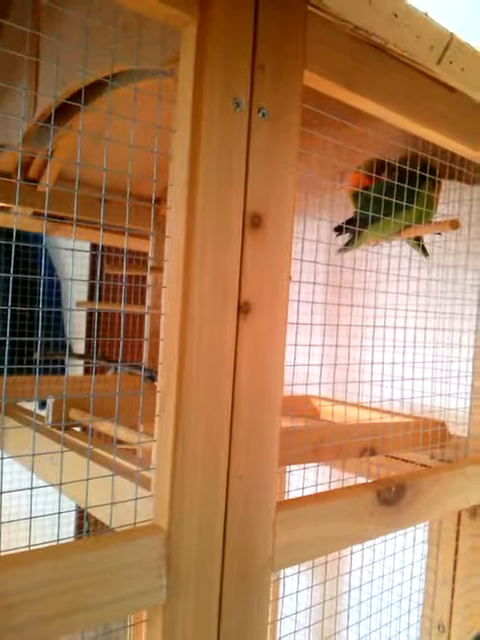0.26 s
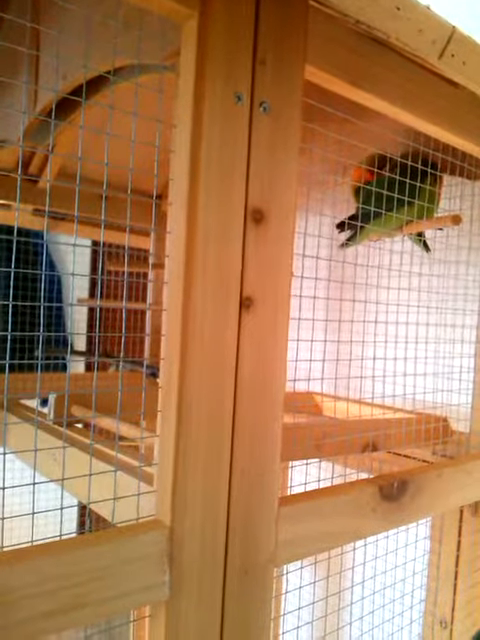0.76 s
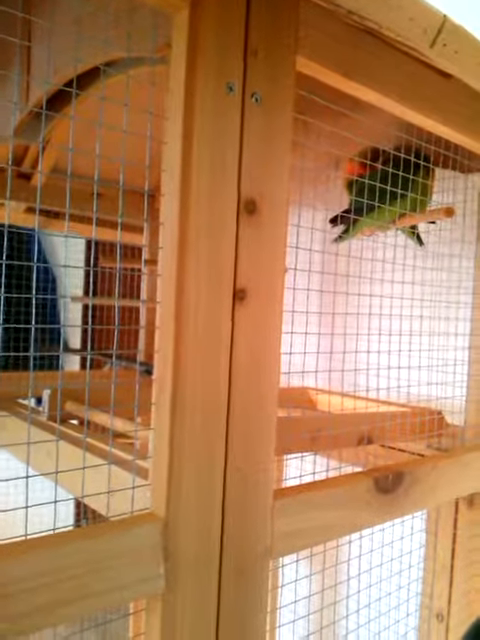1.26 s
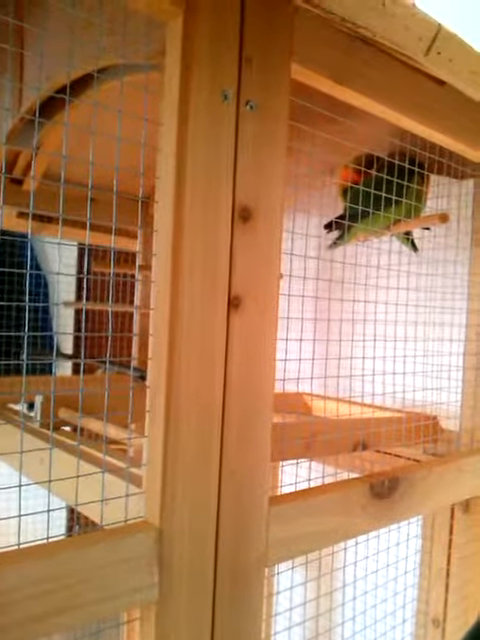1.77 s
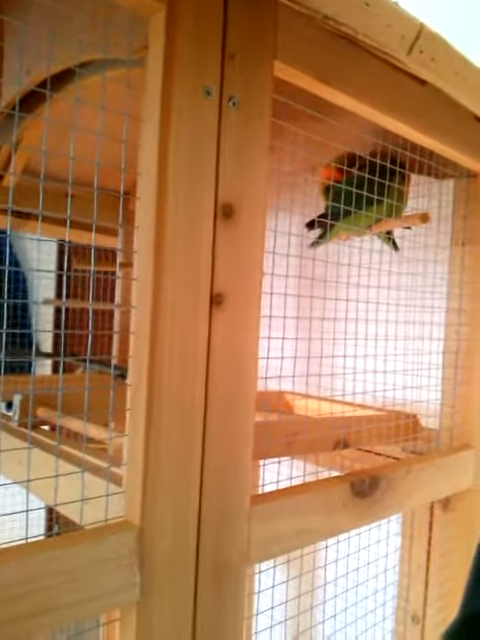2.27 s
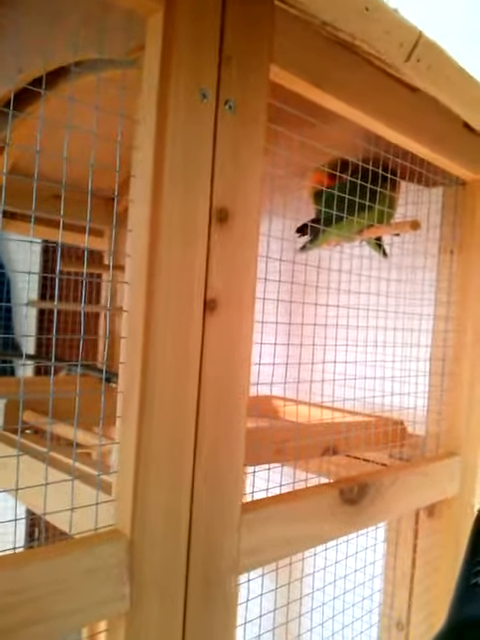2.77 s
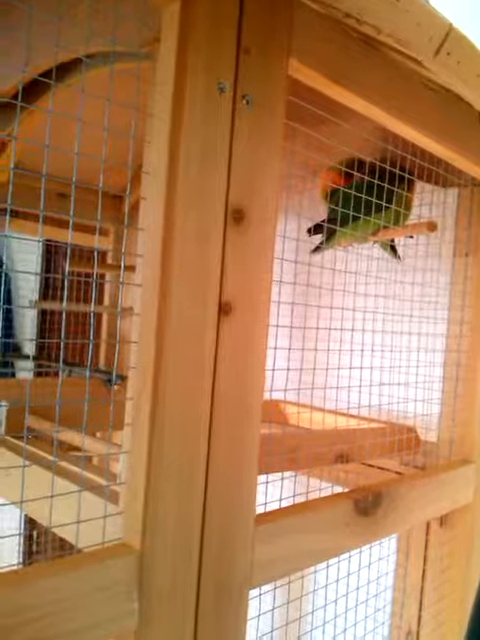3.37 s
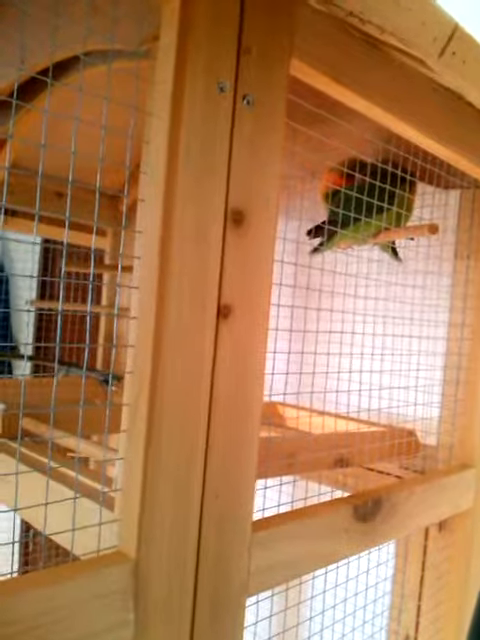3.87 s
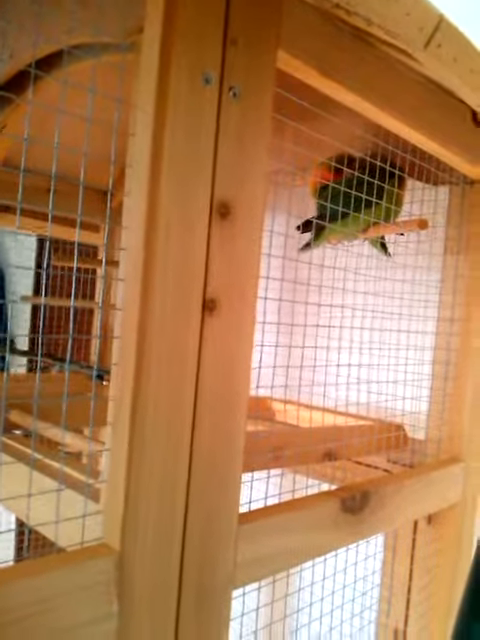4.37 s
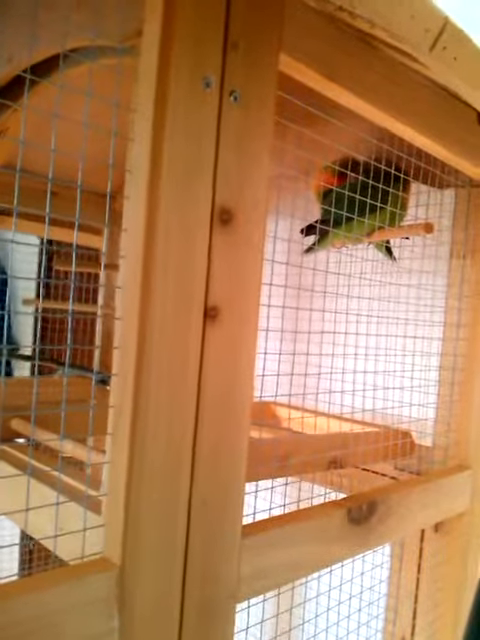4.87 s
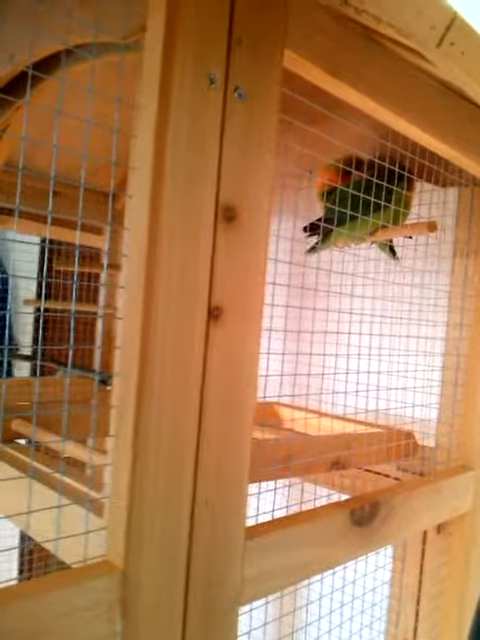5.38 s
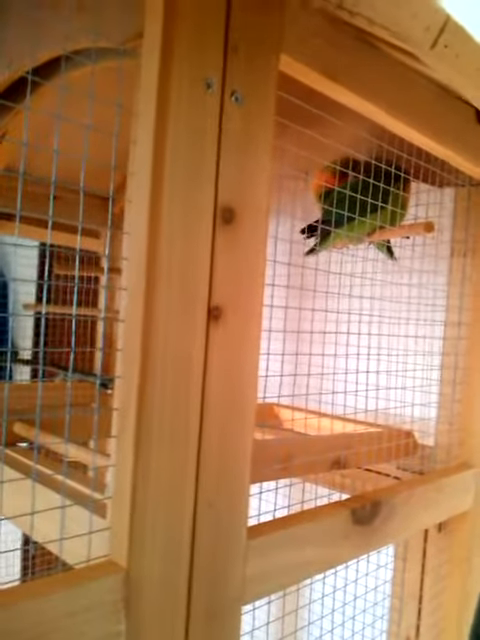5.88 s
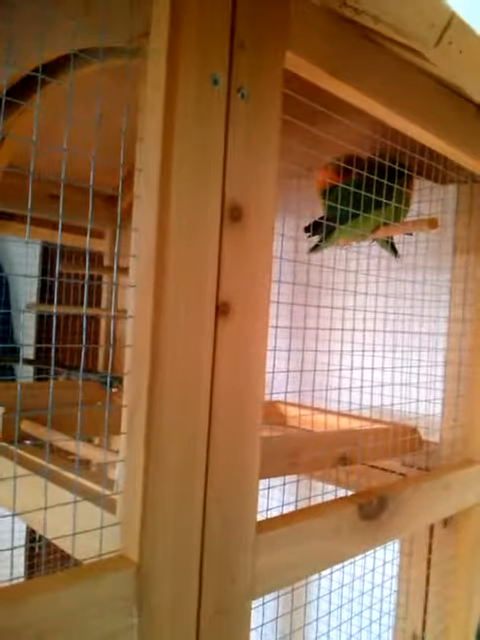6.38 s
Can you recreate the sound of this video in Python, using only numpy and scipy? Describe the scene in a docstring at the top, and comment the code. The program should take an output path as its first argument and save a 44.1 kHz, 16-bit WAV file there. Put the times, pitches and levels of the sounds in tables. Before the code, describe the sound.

A high chirp is already sounding, then a gap, then a sparse twitter thickening into sharp whistles. More bursts follow, the busiest a little past the middle, with further groups near the end and one last small chirp. The parrot's voice glides fast, piercing at its peaks, hoarse at the breaks. A small reverberant wooden enclosure surrounds it; soft room hiss and a low wavering hum lie beneath, dipping when the bird rests.

```python
"""A whistle already under way opens the scene: a small parrot chirps and twitters on its perch.
Its syrinx makes gliding whistles with overtones and a hoarse rasp; low croaks fall in between.
The wooden indoor aviary rings after each note: sparse close echoes, then a dense noise tail.
Shaped noise gives the room hiss and a wavering sine the mains hum below the bird.
The recorder's expander lets both sink in the pauses."""
import sys
import numpy as np
from scipy import signal
from scipy.fft import rfft, irfft, next_fast_len
from scipy.io import wavfile
from scipy.ndimage import uniform_filter1d

SR = 44100
rng = np.random.default_rng(int(sys.argv[2]) if len(sys.argv) > 2 else 0)


def linear_from_db(decibels):
    """Turn decibels (scalar or array-like) into linear amplitude factors; 0 gives 1."""
    return 10 ** (np.asarray(decibels, float) / 20)


def dump(signal):
    """Clip the signal to [-1, 1] and save it as 16-bit WAV at the path in sys.argv[1]."""
    limited = np.clip(np.atleast_2d(signal).T, -1, 1)
    pcm = np.round(limited * 32767).astype(np.int16)
    wavfile.write(sys.argv[1], SR, pcm)


N = 291942   # scene length in samples
LEAD = round(0.05 * SR)   # samples ahead of time zero, where the first notes begin

# Parrot notes: overtones_db, rasp_db (both before the voice's own shifts), contour.
# Contour rows: time_s, pitch_hz, effort_db (level of the fundamental)
PARROT_NOTES = [ (-42, -42.5, [(-0.04, 3592, -24), (-0.025, 4300, -24.5), (-0.012, 5900, -23.5),
                (0.0, 3770, -24), (0.004, 3780, -25.5), (0.007, 5210, -24.5), (0.017, 5364, -22.5),
                (0.02, 4750, -26), (0.024, 4210, -27), (0.036, 4183, -27)]),
                (-67.5, -67, [(-0.01, 2410, -45), (0.03, 2493, -52.5)]),
                (-73.5, -63.5, [(0.654, 2430, -59.5), (0.66, 2550, -55.5)]),
                (-48, -67.5, [(0.662, 2680, -38), (0.672, 3010, -44), (0.68, 3220, -41)]),
                (-49, -52, [(0.681, 3550, -41.5), (0.69, 3810, -52.5)]), (-53.5, -63, [(0.775, 1600, -46),
                (0.785, 1794, -50)]), (-61.5, -74.5, [(0.836, 1820, -54), (0.848, 2070, -57)]),
                (-54.5, -52, [(0.918, 1533, -45.5), (0.927, 2896, -46)]),
                (-51.5, -60, [(0.928, 3250, -52.5), (0.932, 3360, -56), (0.935, 3320, -62.5),
                (0.939, 3474, -50)]), (-62, -57, [(0.942, 2940, -62.5), (0.955, 1625, -51.5)]),
                (-48, -46, [(1.02, 3210, -52), (1.027, 3210, -38.5), (1.04, 1947, -43.5),
                (1.055, 1903, -46)]), (-43.5, -56.5, [(1.14, 3130, -44.5), (1.146, 3230, -43),
                (1.153, 3640, -44)]), (-55.5, -46, [(1.154, 3503, -44), (1.162, 3118, -33),
                (1.166, 3955, -44.5), (1.176, 3865, -38.5)]), (-47.5, -61.5, [(1.499, 2760, -50.5),
                (1.505, 2406, -47.5), (1.513, 2030, -49), (1.524, 2064, -41.5)]),
                (-44.5, -42.5, [(1.581, 3000, -35), (1.586, 3016, -41.5), (1.588, 3600, -25),
                (1.59, 3850, -27.5)]), (-44.5, -48, [(1.591, 4270, -4), (1.593, 4920, -28.5),
                (1.597, 5694, -29), (1.604, 5670, -28), (1.608, 5890, -27.5), (1.611, 5316, -26.5),
                (1.622, 5150, -31.5)]), (-60, -45.5, [(1.717, 1862, -52), (1.719, 1890, -57)]),
                (-47.5, -49, [(1.726, 1740, -35), (1.732, 1676, -39), (1.742, 1474, -62)]),
                (-39.5, -50.5, [(1.8, 3200, -32), (1.81, 3407, -44), (1.818, 3138, -25.5)]),
                (-48.5, -43, [(1.819, 3015, -29), (1.824, 2450, -36.5), (1.838, 2047, -38)]),
                (-39.5, -50, [(1.897, 6030, -28), (1.903, 5674, -37.5), (1.91, 6700, -21),
                (1.922, 6836, -36)]), (-44.5, -43, [(2.476, 3510, -39.5), (2.485, 3037, -27),
                (2.49, 2834, -35.5), (2.5, 2165, -41.5)]), (-62, -51, [(2.589, 3140, -47),
                (2.597, 3540, -39), (2.604, 3680, -63)]), (-34, -56.5, [(2.687, 6310, -29.5),
                (2.691, 6430, -28), (2.693, 6770, -27.5), (2.707, 6860, -30.5), (2.718, 6820, -26.5),
                (2.724, 5480, -37)]), (-51.5, -49.5, [(2.724, 5250, -32), (2.727, 3670, -45),
                (2.733, 4650, -32), (2.738, 3800, -36), (2.746, 4260, -49)]),
                (-38.5, -58, [(2.749, 3070, -41.5), (2.753, 3220, -35.5), (2.756, 4326, -29.5),
                (2.764, 4390, -31.5), (2.767, 5270, -28.5), (2.772, 5800, -32.5), (2.785, 5910, -32.5)]),
                (-56.5, -45.5, [(2.929, 2910, -35.5), (2.935, 2414, -41.5), (2.946, 1860, -41.5)]),
                (-48.5, -45.5, [(3.804, 2905, -30.5), (3.81, 3140, -45)]), (-40, -52, [(3.82, 5510, -43),
                (3.828, 4500, -38), (3.835, 2663, -37.5)]), (-42.5, -54.5, [(3.838, 3317, -45),
                (3.852, 3556, -37), (3.862, 3433, -40.5), (3.87, 3310, -47), (3.876, 3520, -35.5)]),
                (-42.5, -51, [(3.877, 5244, -26.5), (3.893, 5490, -57.5)]),
                (-59, -88, [(4.079, 1560, -40.5), (4.086, 1610, -73)]), (-63, -54.5, [(4.222, 1995, -45),
                (4.227, 2344, -50), (4.233, 2775, -53.5)]), (-43, -40.5, [(4.346, 1918, -47),
                (4.36, 2150, -38.5)]), (-39, -48.5, [(4.36, 4160, -36.5), (4.363, 5420, -29.5),
                (4.37, 6220, -34), (4.385, 6300, -34.5)]), (-50, -57, [(4.386, 3113, -34),
                (4.395, 2600, -32), (4.401, 3065, -34), (4.412, 3040, -51.5), (4.425, 3030, -55)]),
                (-49, -52, [                (4.437, 3474, -39.5), (4.443, 3100, -35.5), (4.452, 2750, -36),
                (4.463, 2670, -39.5)]), (-44.5, -62.5, [(4.466, 4530, -42.5), (4.473, 4550, -39),
                (4.477, 4090, -36.5), (4.483, 4390, -34.5), (4.489, 4590, -38.5), (4.498, 3555, -36.5),
                (4.504, 3960, -31.5), (4.515, 4006, -27.5), (4.518, 4880, -36), (4.528, 4810, -53)]),
                (-48, -52, [(4.596, 4280, -33.5), (4.601, 3890, -37), (4.606, 2736, -36.5),
                (4.613, 2130, -40.5), (4.625, 1635, -41.5)]), (-45, -63, [(4.668, 2894, -34.5),
                (4.678, 3270, -34.5), (4.687, 3216, -39.5)]), (-47.5, -47.5, [(4.688, 3064, -25),
                (4.692, 2450, -42.5), (4.71, 1823, -40)]), (-55.5, -51.5, [(4.762, 3240, -51),
                (4.78, 2914, -44), (4.797, 2570, -45.5)]), (-47, -47, [(5.264, 3160, -43),
                (5.275, 2650, -35.5), (5.281, 3400, -37)]), (-41, -50, [(5.283, 3587, -34.5),
                (5.29, 3750, -44), (5.3, 3523, -46.5), (5.31, 3203, -30.5), (5.323, 2958, -31.5),
                (5.334, 2802, -32)]), (-42, -50.5, [(5.336, 2830, -35), (5.34, 3856, -26),
                (5.35, 6400, -29.5), (5.357, 6430, -32)]), (-52, -47.5, [(5.398, 2174, -30),
                (5.402, 2727, -39.5), (5.407, 2963, -33.5), (5.42, 3262, -32.5), (5.435, 3614, -44)]),
                (-57.5, -52.5, [(5.436, 3850, -36), (5.45, 4285, -43)]), (-60, -40, [(5.871, 2985, -42),
                (5.883, 2670, -43)]), (-42, -53.5, [(5.884, 3464, -31), (5.888, 3797, -34.5),
                (5.908, 3916, -39.5), (5.917, 3480, -38.5), (5.924, 3210, -26.5), (5.932, 2870, -35),
                (5.945, 2790, -37.5)]), (-44, -52.5, [(5.952, 6120, -33), (5.97, 5610, -34),
                (5.978, 4146, -29), (5.99, 3740, -38), (5.998, 2966, -34)]),
                (-41.5, -52.5, [(6.0, 2570, -25.5), (6.005, 2740, -29.5),
                               (6.011, 3293, -48.5), (6.025, 3340, -34.5)]),
                (-47.5, -52, [(6.027, 3890, -9), (6.032, 3980, -45.5), (6.045, 3556, -36)]),
                (-47.5, -50.5, [(6.327, 2700, -29), (6.331, 3210, -34.5), (6.338, 2830, -49.5)]),
                (-54, -49.5, [(6.33, 3950, -29.5), (6.332, 4490, -32), (6.336, 3915, -38),
                (6.34, 4034, -32), (6.345, 3885, -37.5), (6.348, 5886, -39), (6.352, 3910, -41.5)]), ]
# Throat and microphone colour of the rasp: frequency_hz, relative_level_db
RASP_COLOUR = [(500, -31), (1100, -23.5), (2000, 0), (3500, 2.5), (6500, 10.5), (9500, 11.5), (11500, 3),
               (12800, -4.5), (13800, 12.5), (14800, -7), (16000, 5)]
# Overtone strength by sung pitch: pitch_hz, gain_db
OVERTONES_BY_PITCH = [(1600, -5), (2300, 5), (3200, 0), (4200, 0.5), (5500, -4.5), (6800, -4.5)]
# Beak colour, heard on the overtones: frequency_hz, gain_db
BEAK_COLOUR = [(3500, -3.5), (5000, -2), (6500, 2), (8000, 3.5), (9700, 8.5), (11500, 5.5), (13500, 4),
               (16000, -2)]
# Change for each partial above the second, by sung pitch: pitch_hz, gain_per_partial_db
UPPER_PARTIAL_FALL = [(1600, -7.0), (2300, -6.0), (3000, -3.0), (3500, -2.0), (4200, -8.0), (5500, -14.0)]
# Time for the room tail to fall 60 dB: frequency_hz, decay_s
TAIL_DECAY = [(800, 0.32), (2000, 0.41), (4000, 0.4), (7000, 0.32), (11000, 0.22), (16000, 0.13)]
# Tail colour, as highs beam past the walls: frequency_hz, relative_level_db
TAIL_COLOUR = [(800, 2), (2500, -1.5), (5000, -4.5), (8000, -8), (12000, -1.5), (16000, 1)]
# Spectrum of the room hiss: frequency_hz, relative_density_db (per Hz)
HISS_COLOUR = [(12, -17), (20, -12.5), (48, -6.5), (104, -7), (145, -8.5), (240, -8.5), (555, -13),
               (891, -14), (997, -16), (4890, -23), (7650, -22.5), (14500, -26), (15800, -27.5)]
# Low croaks between whistles: start_s, length_s, throat_hz, level_db
CROAK_EVENTS = [(0.948, 0.0051, 1040, -54), (1.15, 0.02, 1130, -61.5), (1.714, 0.018, 1060, -57.5),
                (2.581, 0.008, 1480, -54), (2.735, 0.024, 1310, -58), (2.94, 0.011, 950, -57),
                (4.416, 0.014, 1280, -52.5), (4.465, 0.0051, 1330, -78), (4.758, 0.031, 1100, -57.5),
                (5.379, 0.015, 1180, -53), (5.388, 0.0087, 1690, -60), (5.942, 0.017, 1490, -53.5),
                (6.324, 0.014, 1060, -61)]


def rms_one(x):
    """Scales to rms 1."""
    return x / np.sqrt(np.mean(x ** 2) + 1e-20)


def at_hz(points, hz):
    """Reads a two-column table on a log-frequency axis."""
    table_hz, table_value = np.array(points).T
    return np.interp(np.log(np.maximum(hz, 1)), np.log(table_hz), table_value)


def coloured(length, spectrum):
    """Noise with the given spectrum, rms 1."""
    size = next_fast_len(length)
    hz = np.arange(size // 2 + 1) * SR / size
    shaped = rfft(rng.standard_normal(size)) * linear_from_db(at_hz(spectrum, hz))
    return rms_one(irfft(shaped, size)[:length])


def drift(rate_hz):
    """Random wander of rms 1: noise through two equal one-pole low-passes."""
    r = np.exp(-2 * np.pi * rate_hz / SR)
    noise = rng.standard_normal(N + SR)
    settled = signal.lfilter([1], [1, -2 * r, r * r], noise)[SR:]
    return rms_one(settled)


def parrot(flutter_db=3.5):
    """Syrinx notes: a gliding, fluttering stack of partials plus breath chopped by the membranes."""
    attack_s, release_s = 0.002, 0.003   # release is a time constant
    clear_waver, hoarse_waver, break_waver = 0.007, 0.049, 0.035   # shares of the pitch
    overtones_follow, rasp_follows = 0.54, 0.3   # shares of the effort's swing within a note
    # A fast glide breaks the voice: rasp gains, overtones fade; half strength at this speed.
    break_rasp_db, break_overtones_db, break_octaves_per_s = 10.5, -6.5, 79

    out = np.zeros(N + LEAD)
    breath = coloured(N + LEAD, RASP_COLOUR)
    flutter = linear_from_db(flutter_db * drift(253))
    unsteady = drift(243)
    for overtones_db, breathy_db, contour in PARROT_NOTES:
        time_s, *columns = np.transpose(contour)
        i = np.arange(round(time_s[0] * SR), round((time_s[-1] + 5 * release_s) * SR))
        t = i / SR
        pitch_hz, level_db = [np.interp(t, time_s, column) for column in columns]
        swing_db = level_db - level_db.mean()

        glide = np.abs(np.gradient(np.log2(pitch_hz), t))   # octaves per second
        glide = uniform_filter1d(glide, size=128)
        broken = glide / (glide + break_octaves_per_s)
        rasp_db = breathy_db + rasp_follows * swing_db + break_rasp_db * broken
        bright_db = overtones_db + overtones_follow * swing_db + break_overtones_db * broken
        bright_db = bright_db + at_hz(OVERTONES_BY_PITCH, pitch_hz)

        # A hoarse voice holds its pitch badly.
        hoarse = np.minimum(linear_from_db(rasp_db - level_db), 1)
        waver = clear_waver + hoarse_waver * hoarse + break_waver * broken
        wavering_hz = pitch_hz * (1 + waver * unsteady[i])
        phase = 2 * np.pi * np.cumsum(wavering_hz) / SR

        voice = linear_from_db(level_db) * np.sin(phase)
        for k in range(2, 9):
            heard = np.clip((19000 - k * pitch_hz) / 3000, 0, 1)   # fades out from 16 to 19 kHz
            fall_db = at_hz(UPPER_PARTIAL_FALL, pitch_hz) * (k - 2)
            partial_db = bright_db + fall_db + at_hz(BEAK_COLOUR, k * pitch_hz)
            voice += heard * linear_from_db(partial_db) * np.sin(k * phase)

        chopping = 1 + 0.5 * np.cos(phase)
        rasp = linear_from_db(rasp_db) * breath[i + LEAD] * chopping
        attack = np.clip((t - time_s[0]) / attack_s, 0, 1)
        release = np.exp(-np.maximum(t - time_s[-1], 0) / release_s)
        out[i + LEAD] += attack * release * flutter[i] * (np.sqrt(2) * voice + rasp)
    return out


def aviary(x):
    """Close echoes off the woodwork, then a diffuse tail that dies band by band."""
    tail_db, early_db = -6, -2.5
    early_fade_s, echoes_per_s = 0.006, 900
    t = np.arange(round(0.8 * SR)) / SR
    white = rng.standard_normal((2, len(t)))   # neighbouring bands use different noise
    tail = 0
    edges_hz = 500 * 2 ** np.arange(0, 5.3, 0.4)
    for k, (low, high) in enumerate(zip(edges_hz, edges_hz[1:])):
        bandpass = signal.butter(2, [low, high], "band", fs=SR, output="sos")
        band = signal.sosfilt(bandpass, white[k % 2])
        decay_db = -60 * t / at_hz(TAIL_DECAY, low)
        tail = tail + band * linear_from_db(at_hz(TAIL_COLOUR, low) + decay_db)
    tail *= 1 - np.exp(-t / 0.0075)   # the diffuse field builds up

    echoes = rng.standard_normal(len(t)) * (rng.random(len(t)) < echoes_per_s / SR)
    early = echoes * np.exp(-t / early_fade_s) * (t > 0.001)
    response = linear_from_db(tail_db) * tail / np.linalg.norm(tail)
    response = response + linear_from_db(early_db) * early / np.linalg.norm(early)
    return signal.fftconvolve(x, response)[:len(x)]


def background():
    """Broad room hiss, and mains hum as a sine whose phase and level waver slightly."""
    hum_hz, hum_db, hiss_db = 100.5, -68, -58.5
    phase = 2 * np.pi * hum_hz * np.arange(N) / SR + 0.38 * drift(4)
    hum = np.sqrt(2) * np.sin(phase)
    hiss = linear_from_db(hiss_db) * coloured(N, HISS_COLOUR)
    return hiss + linear_from_db(hum_db + 1.2 * drift(6)) * hum


def croaks(slaps_per_s=500, width_hz=650):
    """Uneven slaps of the slack membranes ring the throat, a resonance passed twice."""
    out = np.zeros(N + LEAD)
    slap = rng.random(N) < slaps_per_s / SR
    slaps = rng.standard_normal(N) * (0.45 + 4 * slap)   # strong slaps over weak noise
    r = np.exp(-np.pi * width_hz / SR)
    for start_s, length_s, throat_hz, level_db in CROAK_EVENTS:
        i = np.arange(round(start_s * SR), round((start_s + length_s) * SR))
        poles = [1, -2 * r * np.cos(2 * np.pi * throat_hz / SR), r * r]
        ringing = signal.lfilter([1, 0, -1], np.convolve(poles, poles), slaps[i])
        swell = np.sqrt(2 * np.hanning(len(i)))
        out[i + LEAD] += linear_from_db(level_db) * rms_one(ringing) * swell
    return out


def scene():
    """The bird and its room sound, over hiss and hum."""
    bird = parrot() + croaks()
    in_room = (bird + aviary(bird))[LEAD:]
    return (in_room + background())[None]


def expander(x, size=128):
    """Gain creeps up while the level is above a threshold and sinks slowly below it."""
    open_above_db, shut_db = -52.5, -9
    open_db_per_s, shut_db_per_s = 41.5, 15.5
    power = uniform_filter1d(x[0] ** 2, size * 8)[::size]
    level_db = 10 * np.log10(power + 1e-12)
    gain_db = np.zeros(len(level_db))
    now_db = -5.0   # starts part-way shut
    for k, loud in enumerate(level_db > open_above_db):
        db_per_s = open_db_per_s if loud else -shut_db_per_s
        now_db = np.clip(now_db + db_per_s * size / SR, shut_db, 0)
        gain_db[k] = now_db
    smooth_db = np.interp(np.arange(N) / size, np.arange(len(gain_db)), gain_db)
    return x * linear_from_db(smooth_db)


def low_pass(x):
    """Removes everything above the highest recorded frequency."""
    return signal.sosfilt(signal.butter(12, 15960, fs=SR, output="sos"), x)


def record(dry):
    """Rides the level with the expander and returns the finished mix."""
    mix = expander(dry)
    return low_pass(mix)


dry = scene()
out = record(dry)
dump(out)
```